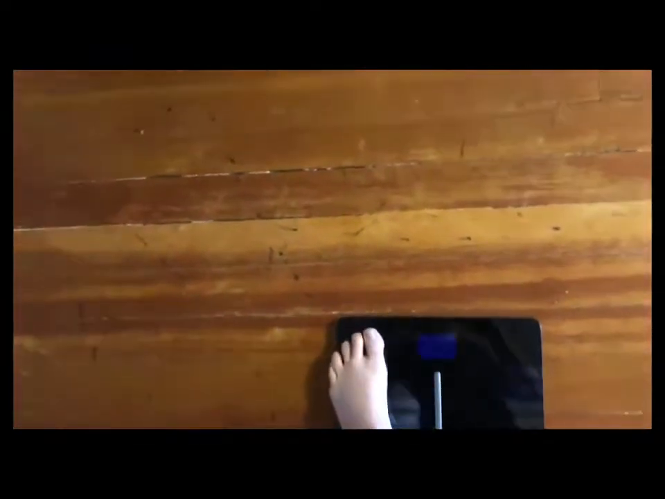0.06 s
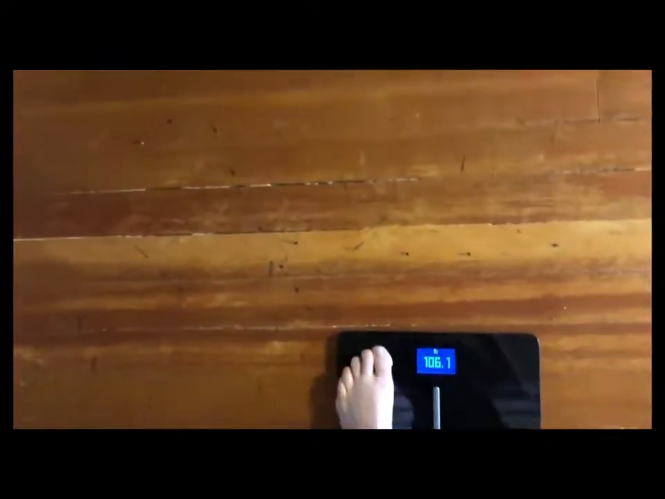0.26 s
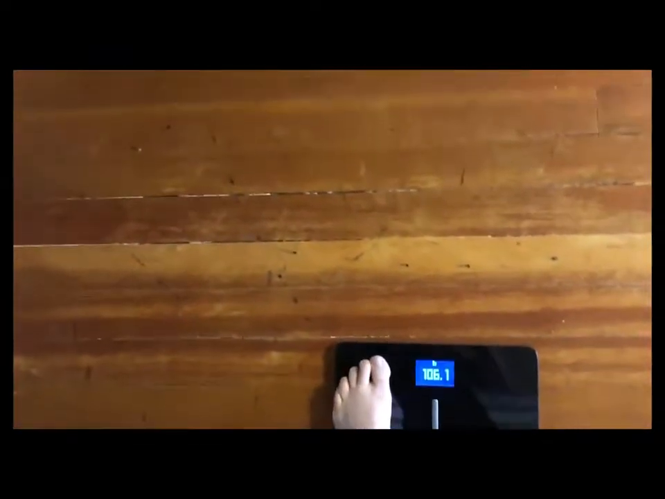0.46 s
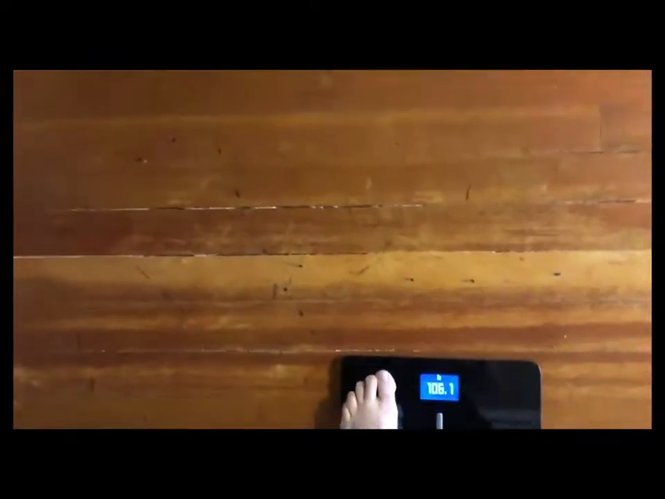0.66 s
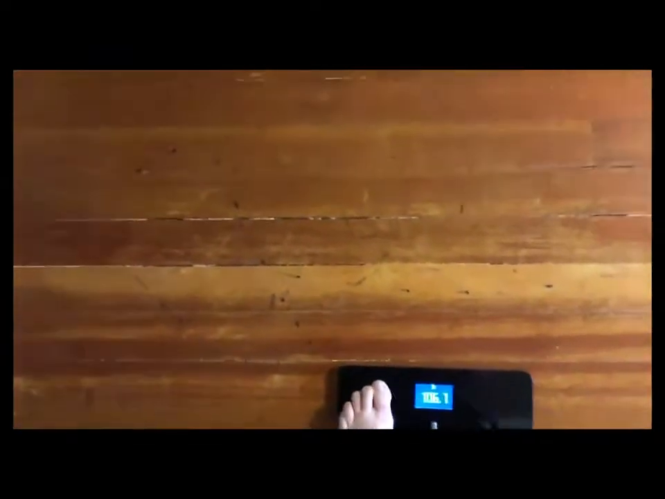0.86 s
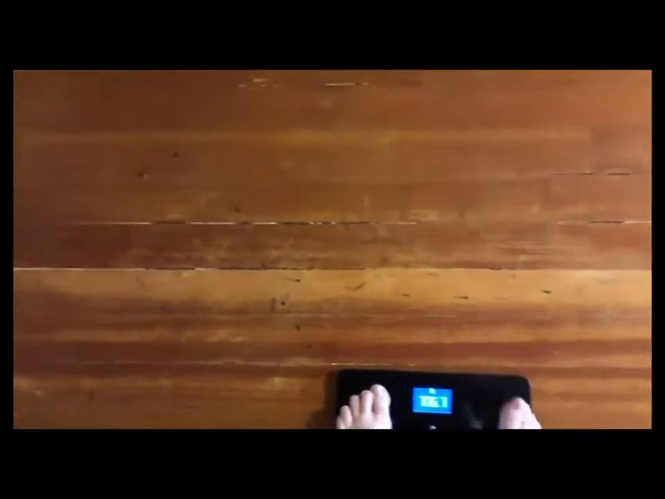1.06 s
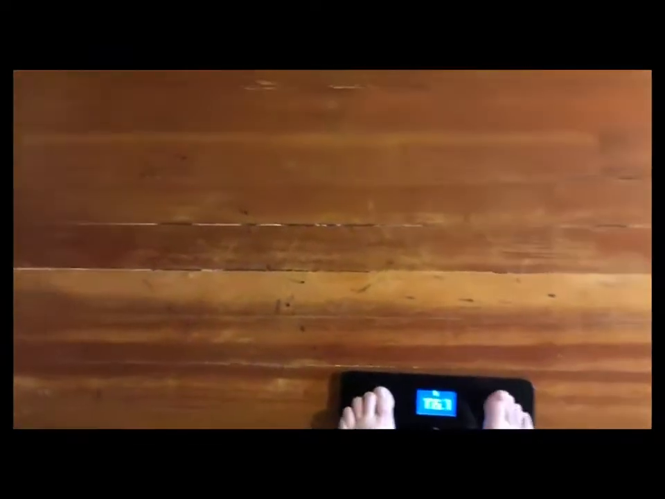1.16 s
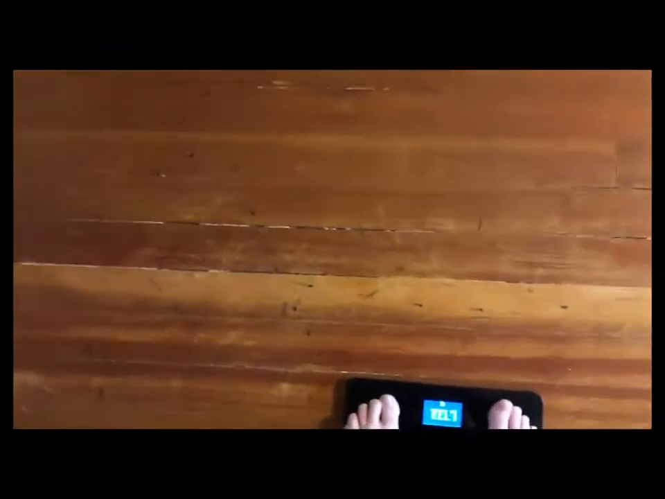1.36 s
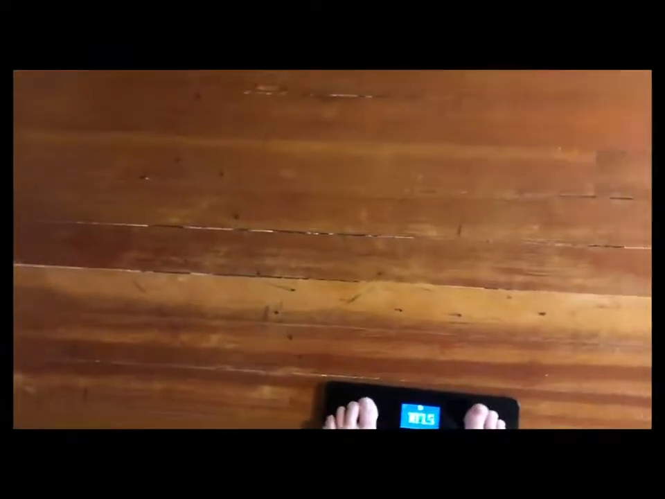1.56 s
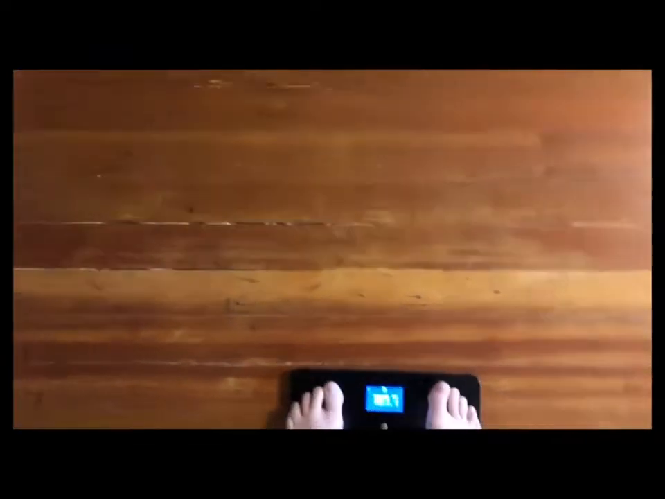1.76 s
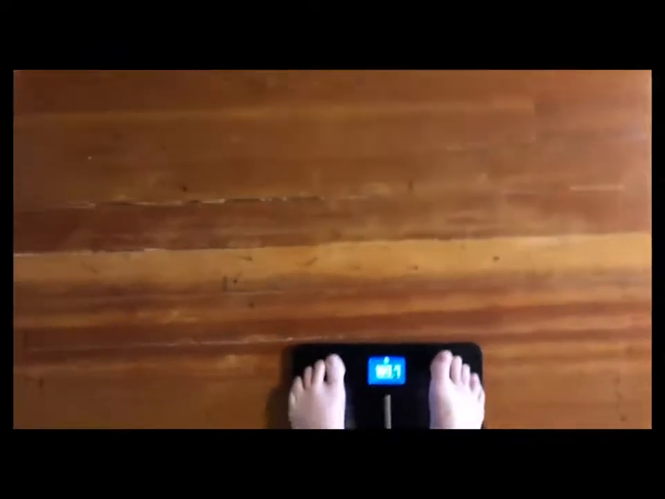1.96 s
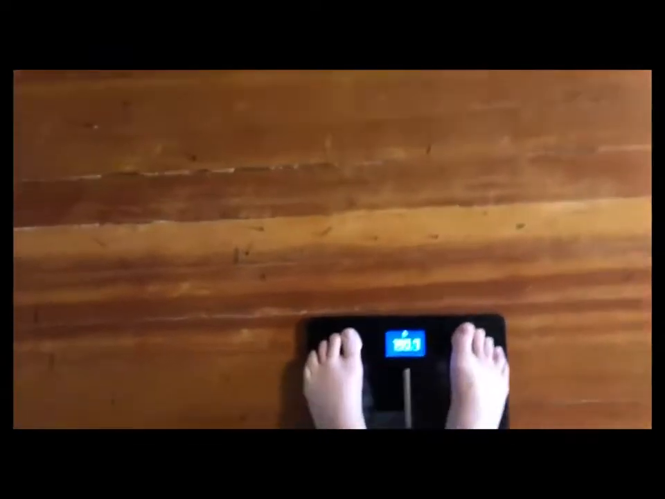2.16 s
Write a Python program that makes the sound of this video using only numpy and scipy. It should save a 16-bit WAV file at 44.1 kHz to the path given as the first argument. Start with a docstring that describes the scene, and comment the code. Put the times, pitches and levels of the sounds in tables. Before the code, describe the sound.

A bare foot thumps onto a glass bathroom scale on a wooden floor, then near quiet

```python
"""A bare foot thumps onto a glass bathroom scale on a wooden floor; the scale rocks once more.
Contact forces ring decaying modes: hard contact the glass plate, soft pushes the floorboards.
Under shifting weight the scale ticks (noise snap, plate ring), soft bumps ring the boards, and skin
scuffs as grainy band noise. An appliance hums in sines over shaped room noise. The small room adds
decaying noise reflections and one low resonance."""
import sys
import numpy as np
from scipy import signal
from scipy.fft import rfft, irfft
from scipy.io import wavfile
from scipy.ndimage import uniform_filter1d

SR = 44100
rng = np.random.default_rng(int(sys.argv[2]) if len(sys.argv) > 2 else 0)


def master_out(mix):
    """Clip the mix to full scale and print it as 16-bit PCM to the path in sys.argv[1]."""
    frames = np.transpose(np.atleast_2d(mix))
    ceiling = np.clip(frames, -1, 1)
    pcm = np.round(ceiling * 32767).astype(np.int16)
    wavfile.write(sys.argv[1], SR, pcm)


N = 97902

# Blows of foot and rocking scale:
# (time [s], hard contact [dB], hard length [ms], soft push [dB], soft length [ms])
FOOT_BLOWS = [(.0022, -12.5, 0.2, -28.5, 1.8), (.0068, -31.5, 0.61, -15, 1.64),
              (0.0177, -25.5, 0.25, -23.5, 3.36), (0.0311, -28, 0.23, -28, 0.86),
              (0.041, -31.5, 0.13, -43.5, 3.3), (.046, -50, 0.9, -14.5, 2.55),
              (0.0742, -35, 0.41, -24, 2.5)]
# Modes of the floorboards under the scale: (frequency [Hz], relative level [dB], t60 [s])
BOARD_MODES = [(159.8, -9.5, 0.041), (195.8, -17, 0.24), (228, -6, .06), (308.1, -6, 0.11),
               (336.7, -8.5, 0.28), (406, 2, 0.067), (522, -1.5, 0.074), (598, 0, 0.025), (837, -19, 0.26)]
# Modes of the glass plate: (frequency [Hz], relative level [dB], t60 [s])
PLATE_MODES = [(623, -9.5, 0.043), (936, -4.5, 0.035), (1183.4, -13, 0.059), (1377, -9, 0.065),
               (1630, -8, 0.033), (1878, -7.5, 0.03), (2234, -2, 0.015), (2850, 1, 0.013),
               (3430, -6, 0.012), (4000, -1, 0.0092), (4886, -6.5, 0.012), (5735, -3.5, 0.0042),
               (10300, -27, 0.0031)]
# Ticks of the loaded scale; the first row is the bright snap of the foot's first blow: (time [s], snap level
# [dB], plate push level [dB])
SCALE_TICKS = [(.0022, -30.5, -52), (.8612, -63, -57), (.8835, -62, -58), (.9045, -61, -58),
               (.9185, -66, -59), (.9262, -60, -57), (1.2102, -53, -41), (1.2166, -72, -55),
               (1.596, -73, -53)]
# Soft bumps on the boards: (time [s], push level [dB], push length [ms])
BOARD_BUMPS = [(1.098, -61, 0.87), (1.2124, -53, 1.6), (1.464, -59.5, 1.04), (1.882, -43, 4.9)]
# Scuffs of skin: (start [s], rise [s], fall time constant [s], level [dB], centre [Hz], width [Hz])
SKIN_SCUFFS = [(.335, .02, 0.023, -78.5, 10270, 8900), (0.44, .125, 0.025, -60.5, 830, 800),
               (0.459, 0.12, 0.043, -70, 339, 263.4), (0.853, 0.07, 0.03, -57.5, 1150, 2200),
               (0.858, 0.044, 0.06, -64, 394, 317), (.87, 0.06, 0.025, -71, 6000, 11000),
               (1.585, 0.03, 0.06, -61.5, 900, 1100), (1.593, 0.01, 0.09, -71.5, 3800, 4000)]
# Appliance hum partials: (frequency [Hz], rms level before waver [dB])
HUM_PARTIALS = [(120, -71), (240, -66.5), (900, -84)]
# Room noise spectrum: (frequency [Hz], relative density [dB per Hz])
NOISE_SPECTRUM = [(15, -24), (30, -11), (60, -2), (85, -6), (120, 0), (173, -8), (240, -3), (289, -10),
                  (469, -14), (582, -19), (1270, -18), (2230, -26.5), (5000, -33), (10600, -37.5),
                  (15500, -44)]
# Reverberation bands: (centre [Hz], t60 [s], relative level [dB])
REVERB_BANDS = [(63, 0.5, -3), (127.5, 0.5, -9), (239.3, 0.38, -13), (500, 0.37, -11), (961, 0.32, -8),
                (2000, 0.34, -5), (4013, 0.32, -5.5), (6900, 0.25, -4), (10000, 0.17, -5),
                (14500, 0.12, -5)]
# Lowest air resonance: (frequency [Hz], level [dB], rise [s], t60 [s])
AIR_MODE = (54, -36.5, .045, .38)

HUM_WAVER_DB, HUM_WAVER_HZ = 0.7, 3.9
ROOM_NOISE_RMS_DB = -66.2
REVERB_RISE_S = 0.0045
SCUFF_GRAIN_DB, SCUFF_GRAIN_HZ = 2.4, 230
SNAP_MS, SNAP_HZ, SNAP_WIDTH_HZ = 1.47, 7500, 16000
TICK_PUSH_MS, TICK_LAG_S = 0.56, 0.0005
SNAP_ROOM_DB, SCUFF_ROOM_DB = -7, -9  # send to the room
RADIATE_HZ = 95  # the boards radiate little below this
TOP_HZ = 15850


def undb(db):
    """Gain of a level in dB."""
    return 10 ** (np.asarray(db) / 20)


def band(x, hz, width_hz):
    """Band-pass with its edges geometrically centred on hz."""
    low_hz = np.sqrt(hz ** 2 + width_hz ** 2 / 4) - width_hz / 2
    edges_hz = [low_hz, min(low_hz + width_hz, 0.45 * SR)]
    return signal.sosfilt(signal.butter(2, edges_hz, "bandpass", fs=SR, output="sos"), x)


def unit(x):
    """Scale to rms 1."""
    return x / np.sqrt(np.mean(x ** 2))


def walk(rate_hz):
    """Smooth random wander of rms 1: noise averaged twice over 1/rate."""
    length = int(SR / rate_hz)
    smooth = uniform_filter1d(rng.standard_normal(N), length)
    return unit(uniform_filter1d(smooth, length))


def push(start_s, db, length_ms):
    """Smooth sine-squared contact force, its area set by the level."""
    progress = np.clip((np.arange(N) / SR - start_s) * 1000 / length_ms, 0, 1)
    shape = np.sin(np.pi * progress) ** 2
    return undb(db) * shape / shape.sum()


def ring(force, modes):
    """A force rings decaying modes, neighbours in opposite phase."""
    t = np.arange(SR // 2) / SR
    body = np.zeros(len(t))
    for k, (hz, db, t60_s) in enumerate(modes):
        decay = 1000.0 ** (-t / t60_s)
        body += (-1) ** k * undb(db) * np.sin(2 * np.pi * hz * t) * decay
    return signal.fftconvolve(force, body)[:N]


def radiate(x):
    """Weak radiation of the lows: a high-pass."""
    return signal.sosfilt(signal.butter(3, RADIATE_HZ, "highpass", fs=SR, output="sos"), x)


def room_noise():
    """Steady room and microphone noise: white noise shaped over log frequency."""
    hz = np.maximum(np.arange(N // 2 + 1) * SR / N, 1)
    table = np.array(NOISE_SPECTRUM)
    density_db = np.interp(np.log(hz), np.log(table[:, 0]), table[:, 1])
    noise = irfft(rfft(rng.standard_normal(N)) * undb(density_db), N)
    return undb(ROOM_NOISE_RMS_DB) * unit(noise)


def appliance_hum():
    """Mains hum of an appliance: sines, each slowly wavering in level."""
    t = np.arange(N) / SR
    out = np.zeros(N)
    for hz, rms_db in HUM_PARTIALS:
        amplitude = np.sqrt(2) * undb(rms_db + HUM_WAVER_DB * walk(HUM_WAVER_HZ))
        out += amplitude * np.sin(2 * np.pi * (hz * t + rng.random()))
    return out


def room(x):
    """Adds diffuse reflections, each noise band dying at its own rate."""
    t = np.arange(SR // 2) / SR
    tail = np.zeros(len(t))
    for hz, t60_s, db in REVERB_BANDS:
        noise = unit(band(rng.standard_normal(len(t)), hz, 0.62 * hz))
        weight = np.sqrt(hz / SR / t60_s / SR * 20)  # by bandwidth and decay length
        tail += undb(db) * weight * noise * 1000.0 ** (-t / t60_s)
    tail *= np.clip(t / REVERB_RISE_S, 0, 1)
    return x + signal.fftconvolve(x, tail)[:N]


def room_boom():
    """The lowest air resonance of the room builds up with the step and fades."""
    hz, db, rise_s, t60_s = AIR_MODE
    t = np.arange(N) / SR
    env = (1 - np.exp(-(t / rise_s) ** 2)) * 1000.0 ** (-t / t60_s)
    return undb(db) * np.sin(2 * np.pi * hz * t) * env


def skin_scuffs():
    """Friction: band noise of grainy level that swells and dies away."""
    t = np.arange(N) / SR
    out = np.zeros(N)
    for start_s, rise_s, fall_s, db, hz, width_hz in SKIN_SCUFFS:
        swell = np.clip((t - start_s) / rise_s, 0, 1)
        fall = np.exp(-np.maximum(t - start_s - rise_s, 0) / fall_s)
        grain = undb(db + SCUFF_GRAIN_DB * walk(SCUFF_GRAIN_HZ))
        noise = band(rng.standard_normal(N), hz, width_hz)
        out += grain * swell * fall * unit(band(noise, hz, width_hz))  # banded twice: steeper
    return out


def board_bumps():
    """Soft pushes ring the floorboards."""
    return radiate(ring(sum(push(*row) for row in BOARD_BUMPS), BOARD_MODES))


def tick_snaps():
    """Bright snap of each tick and of the foot's first blow: a Gaussian burst of wide-band noise."""
    t = np.arange(N) / SR
    noise = unit(band(rng.standard_normal(N), SNAP_HZ, SNAP_WIDTH_HZ))
    half_s = SNAP_MS / 2000
    env = sum(undb(db) * np.exp(-((t - s - half_s) / half_s) ** 2) for s, db, _ in SCALE_TICKS)
    return noise * env


def tick_rings():
    """Dull plate ring that follows each snap: a slightly late push on the glass."""
    force = sum(push(s + TICK_LAG_S, db, TICK_PUSH_MS) for s, _, db in SCALE_TICKS)
    return ring(force, PLATE_MODES)


def foot_step():
    """Hard contact rings the plate, the soft push rings the boards."""
    hard = sum(push(s, db, ms) for s, db, ms, _, _ in FOOT_BLOWS)
    soft = sum(push(s, db, ms) for s, _, _, db, ms in FOOT_BLOWS)
    return radiate(ring(hard, PLATE_MODES) + ring(soft, BOARD_MODES))


def scene():
    """Mixes all sources; the close, small sounds excite the room less."""
    snaps, scuffs = tick_snaps(), skin_scuffs()
    snap_send, scuff_send = undb(SNAP_ROOM_DB), undb(SCUFF_ROOM_DB)
    struck = foot_step() + board_bumps() + tick_rings()
    wet = room(struck + snap_send * snaps + scuff_send * scuffs)
    # room() passes its input, so the rest brings the direct sound to full level
    direct_rest = (1 - snap_send) * snaps + (1 - scuff_send) * scuffs
    mix = wet + direct_rest + room_boom() + appliance_hum() + room_noise()
    return mix[None]


def record(dry):
    """The recorder cuts the top: a steep elliptic low-pass."""
    return signal.sosfilt(signal.ellip(10, 0.2, 60, TOP_HZ, fs=SR, output="sos"), dry)


dry = scene()
out = record(dry)
master_out(out)
```